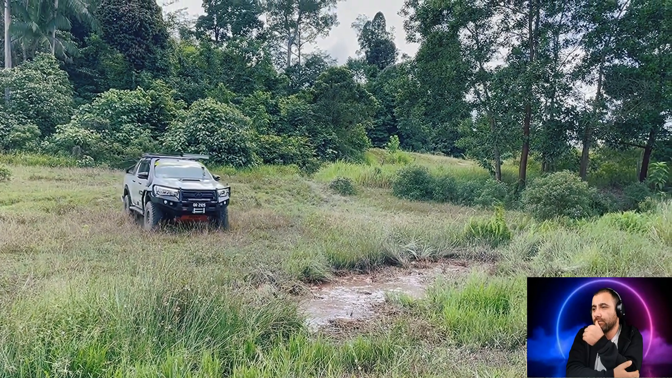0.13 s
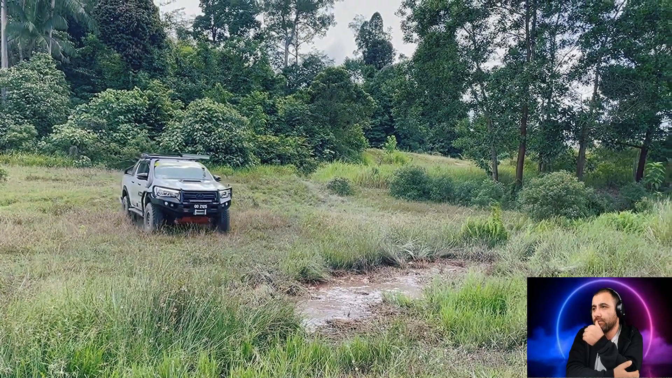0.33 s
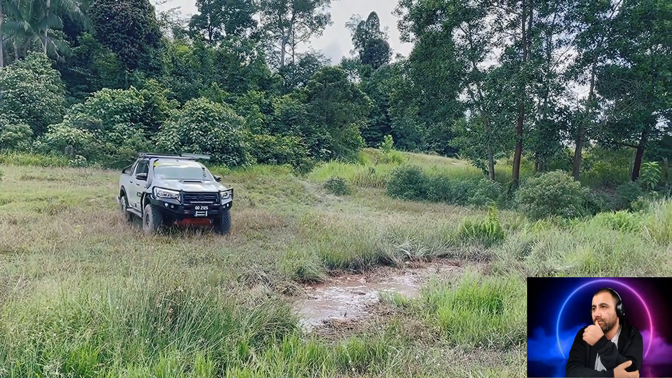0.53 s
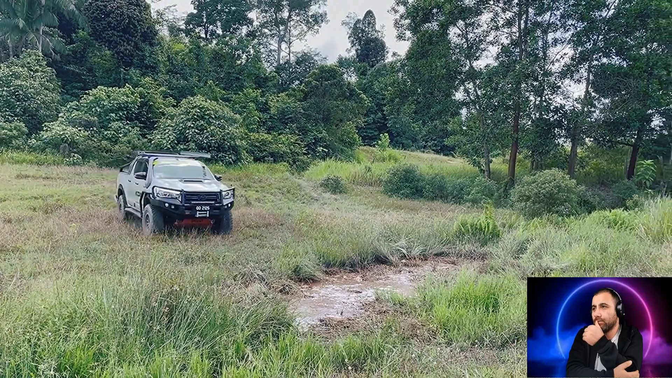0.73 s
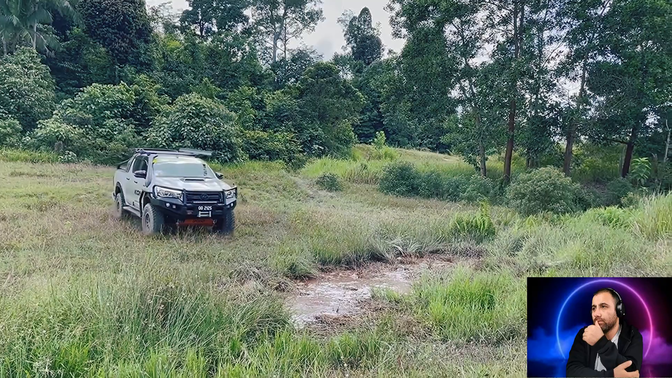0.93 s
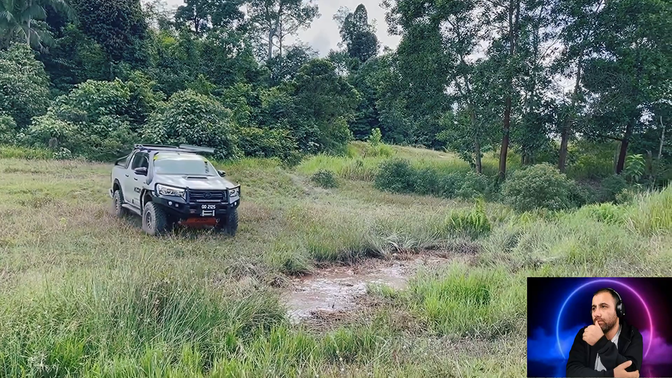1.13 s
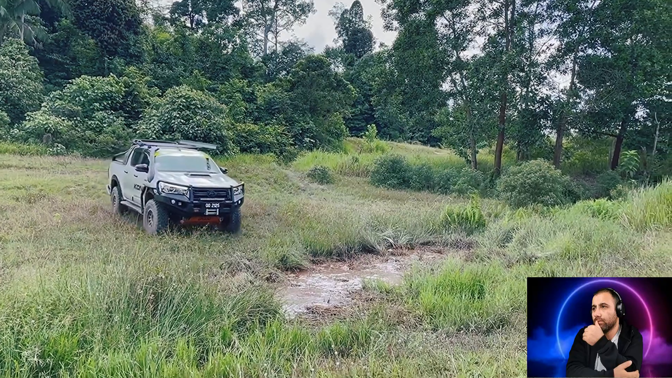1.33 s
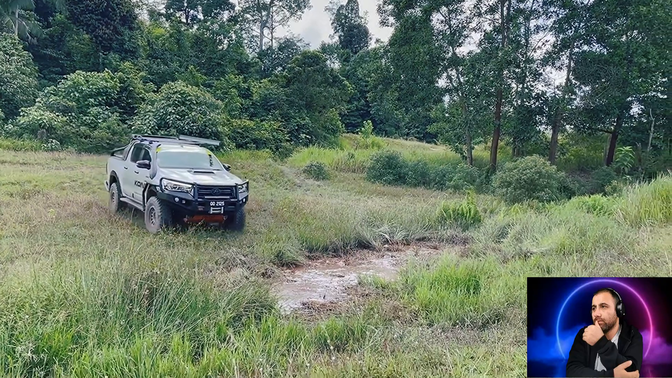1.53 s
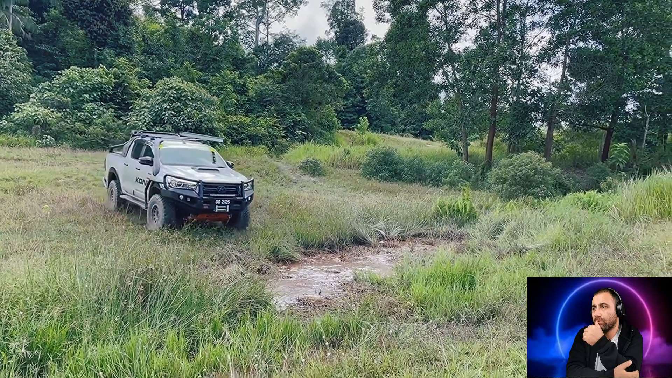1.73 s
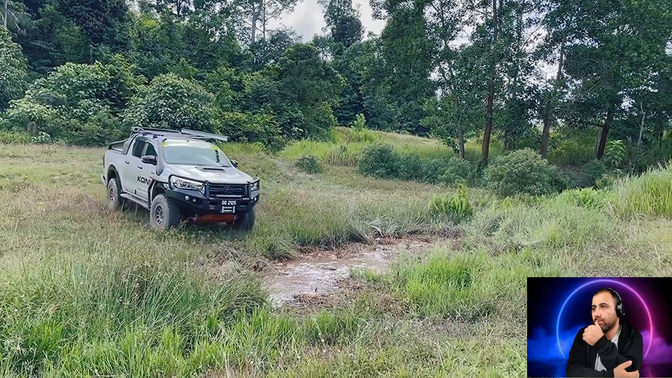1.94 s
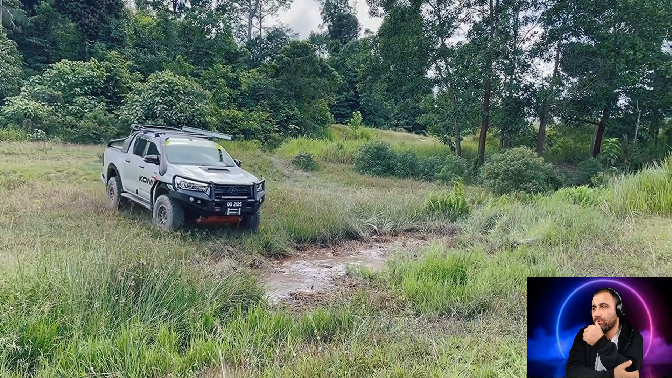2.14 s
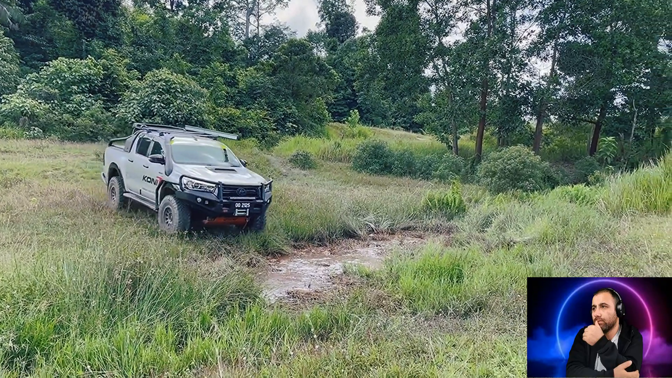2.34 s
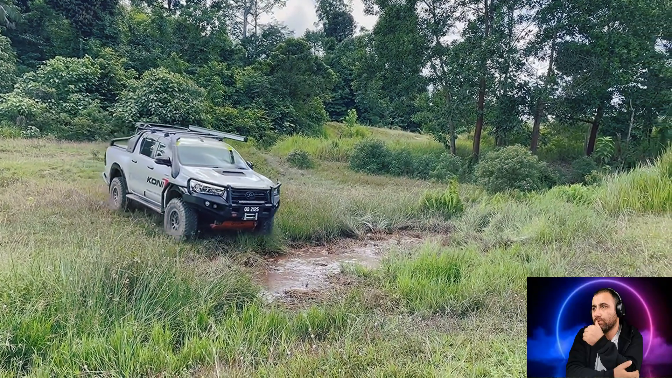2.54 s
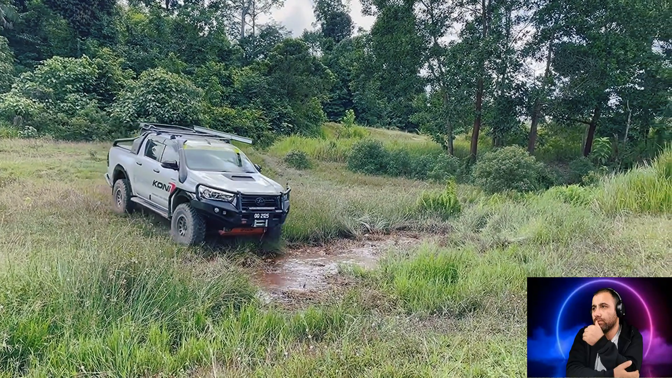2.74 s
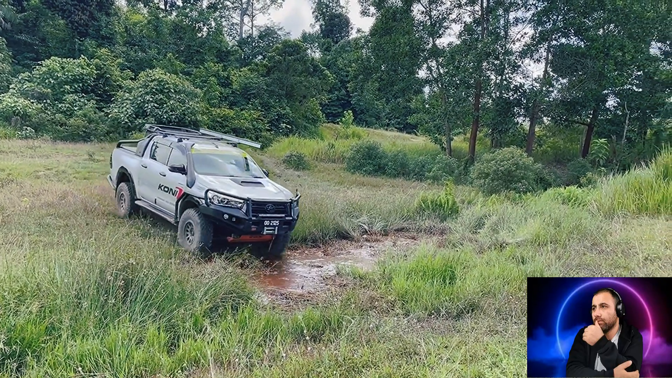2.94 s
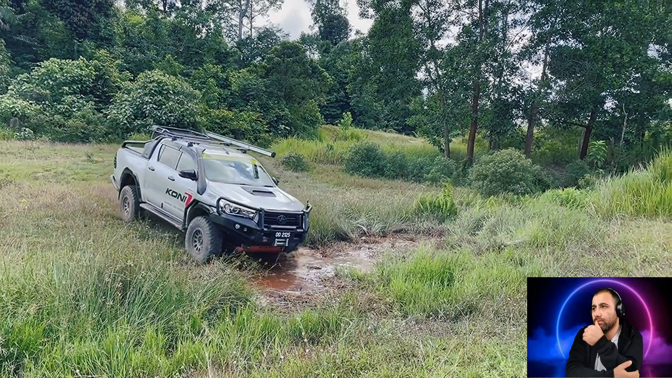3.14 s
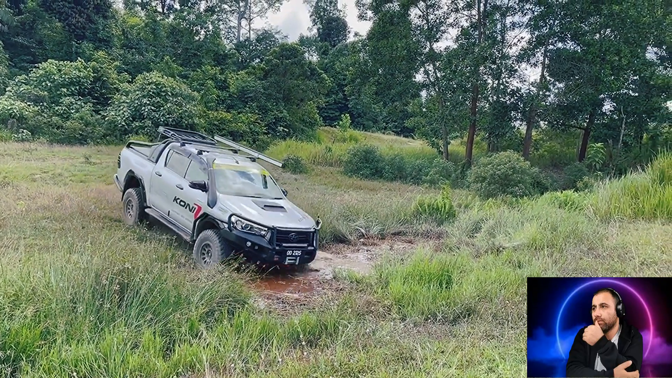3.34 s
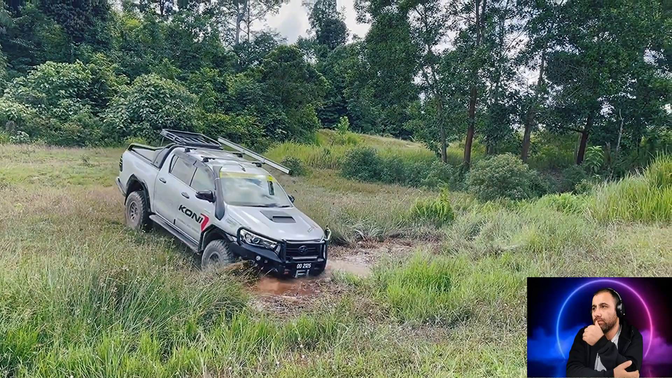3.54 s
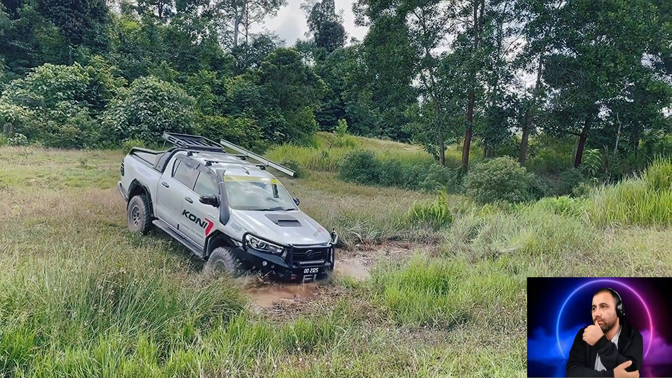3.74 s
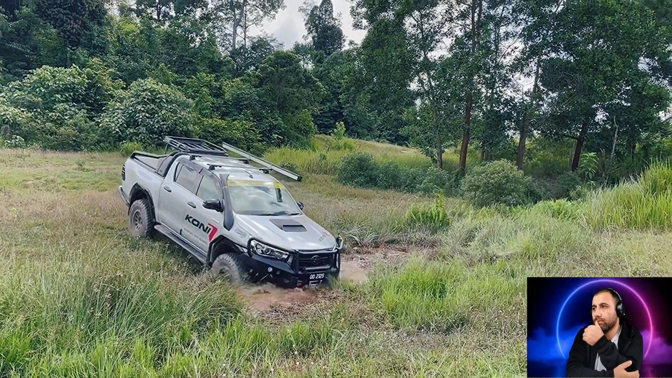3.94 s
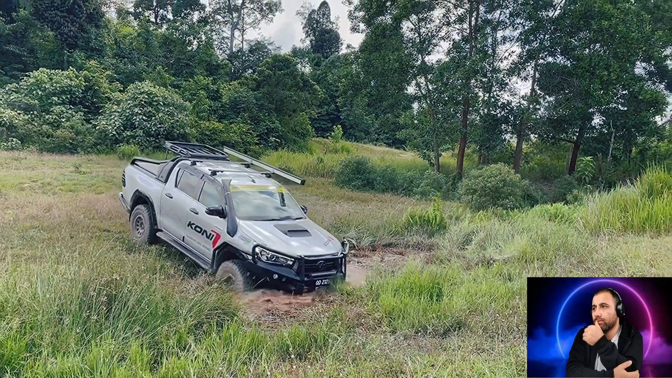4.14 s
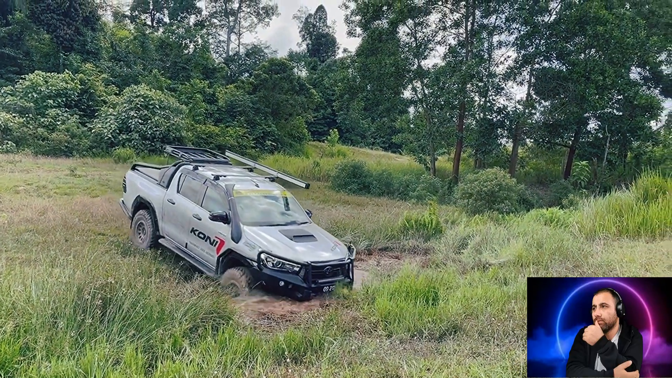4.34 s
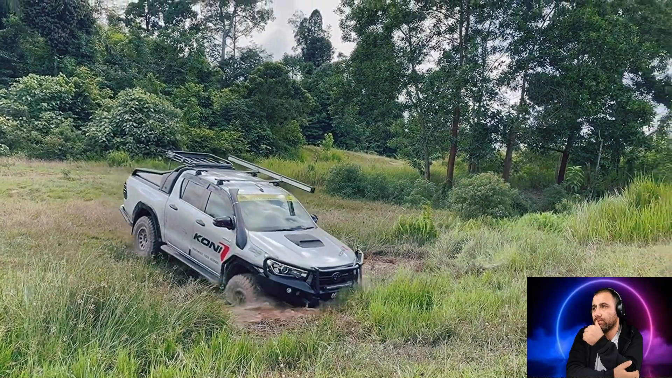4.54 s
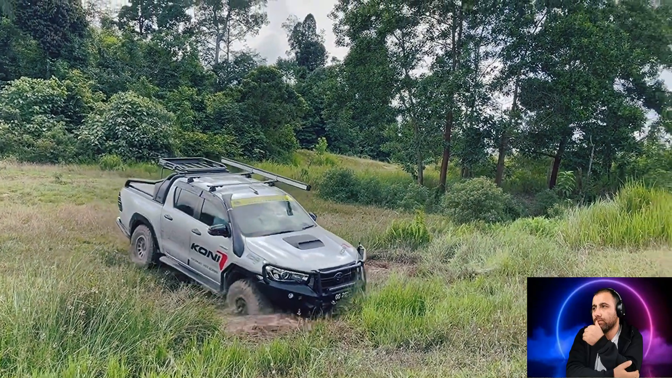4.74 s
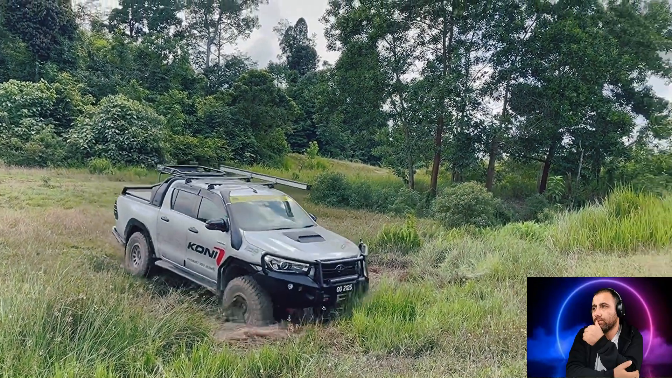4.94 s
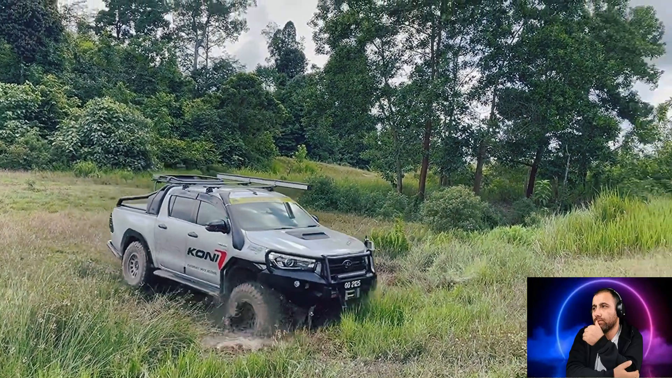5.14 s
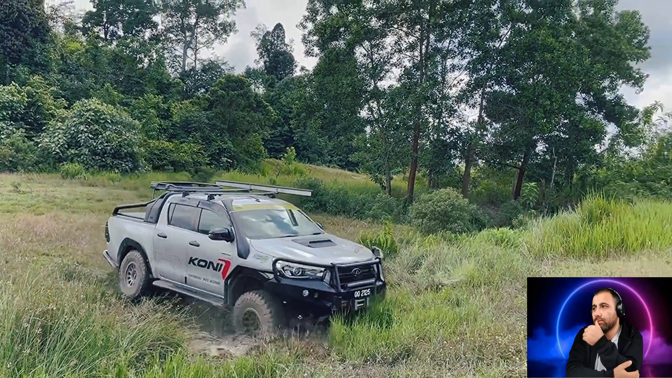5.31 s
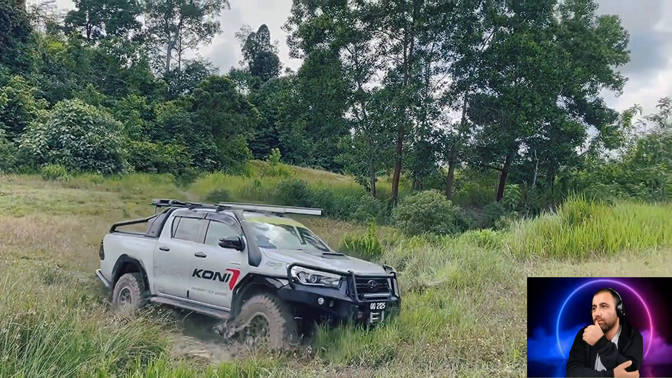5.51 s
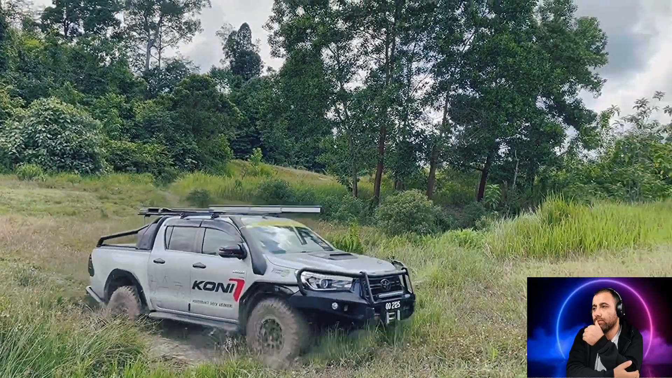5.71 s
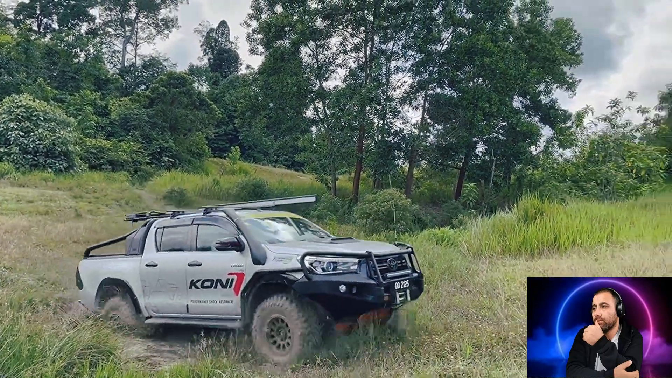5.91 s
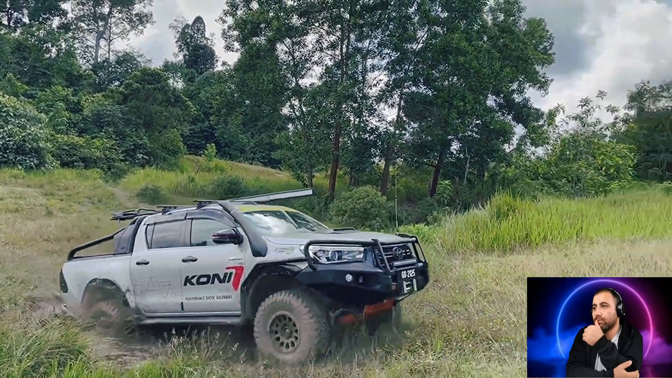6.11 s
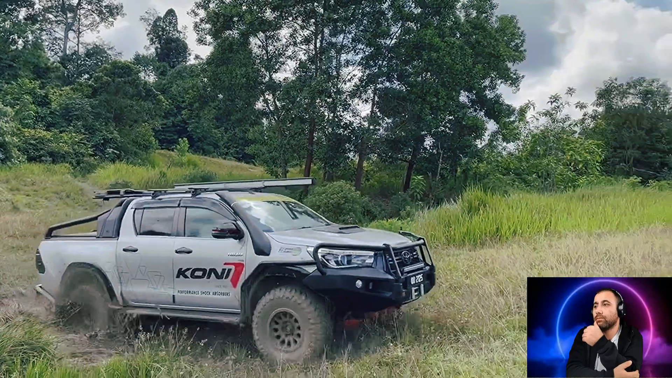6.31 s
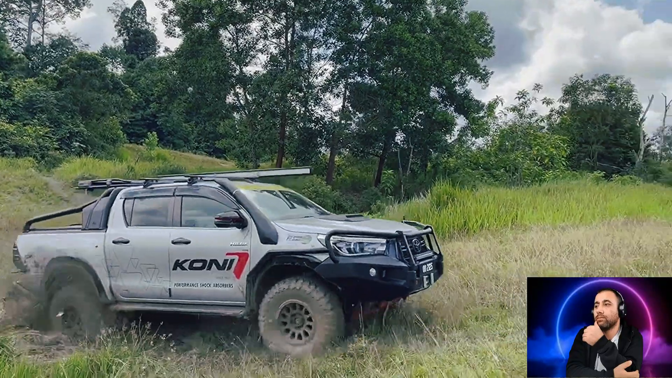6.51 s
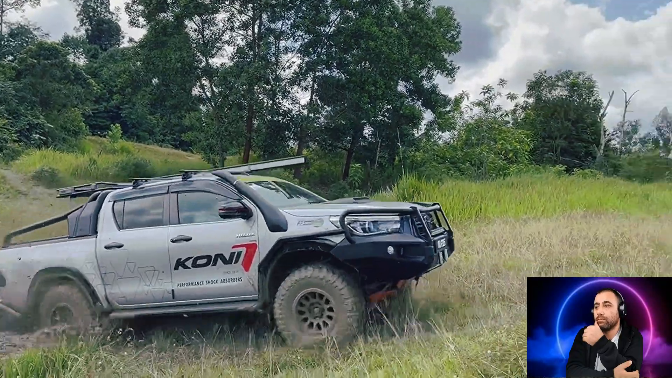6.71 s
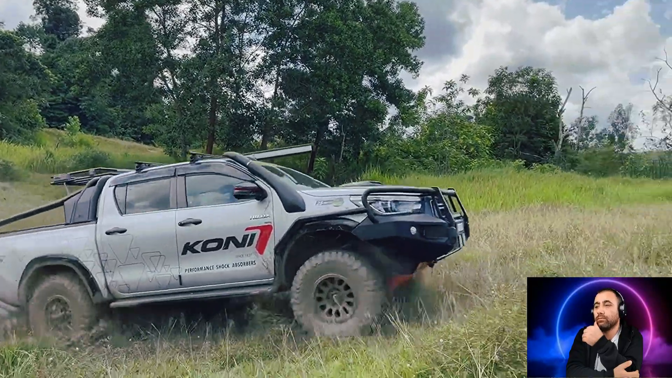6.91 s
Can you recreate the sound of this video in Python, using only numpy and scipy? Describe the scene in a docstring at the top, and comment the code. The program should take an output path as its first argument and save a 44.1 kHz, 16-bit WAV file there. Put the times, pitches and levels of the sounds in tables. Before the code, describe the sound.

A diesel pickup blips and idles in, splashes into a muddy hole, then revs hard and climbs out close by, flinging mud.

```python
"""In a mud hole with leaves all round: a four-cylinder diesel pickup blips, idles in, splashes, then revs hard
and climbs out close by. Exhaust tones follow shaft orders, each firing excites block resonances and noise bursts.
Tyres brush grass, slap and shove water, then fling mud: shaped noise, plus short rising sines for bubbles.
Low hums, gliding drones, body thumps and a faint hiss in the grass complete it; the truck sits a little left."""
import sys
import numpy as np
from scipy import signal
from scipy.fft import rfft, irfft, next_fast_len
from scipy.io import wavfile
from scipy.ndimage import uniform_filter1d, map_coordinates

SR = 44100
rng = np.random.default_rng(int(sys.argv[2]) if len(sys.argv) > 2 else 0)


def invert_db(x):
    """Field ratio 10**(x/20) for x, a level in decibels (scalar or array-like)."""
    u = np.asarray(x, float) / 20
    return 10 ** u


def materialize(psi):
    """Save the field psi as 16-bit PCM at rate SR to the path in sys.argv[1].

    A 1-D psi becomes a single channel; in a 2-D psi each row is a channel.
    """
    bounded = np.clip(np.atleast_2d(psi).T, -1, 1)
    quanta = np.round(bounded * 32767).astype(np.int16)
    wavfile.write(sys.argv[1], SR, quanta)


N = 307022
TIME_S = np.arange(N) / SR


def unit(x):
    """Scaled to rms 1."""
    return x / np.sqrt(np.mean(x ** 2) + 1e-20)


def along(points, hz):
    """Interpolates (Hz, value) points on a log frequency axis."""
    f, v = np.transpose(points)
    return np.interp(np.log(hz + 1), np.log(f + 1), v)


def curves(rows):
    """One value per sample for each column after the time."""
    s, *cols = np.transpose(rows)
    return [np.interp(TIME_S, s, c) for c in cols]


def bumps(rows):
    """Sum of Gaussian level changes in dB; length is the half-width at 1/e."""
    return sum(db * np.exp(-((TIME_S - s) / length) ** 2) for s, db, length in rows)


def wobble(rate):
    """A smooth random curve, rate knots a second."""
    coarse = np.arange(0, N + 16, 16)
    knots = rng.standard_normal(int(N * rate / SR) + 4)
    return np.interp(np.arange(N), coarse, map_coordinates(knots, [coarse * rate / SR]))


def filtered(x, response):
    """x times a response of frequency."""
    m = next_fast_len(N + 8192)
    return irfft(rfft(x, m) * response(np.fft.rfftfreq(m, 1 / SR)), m)[..., :N]


def coloured(x, spectrum):
    """x through a spectrum, at rms 1."""
    return unit(filtered(x, lambda hz: invert_db(along(spectrum, hz))))


def grainy(spiky_db):
    """White noise whose grains differ in size."""
    return rng.standard_normal(N) * invert_db(spiky_db * wobble(600))


def tone(turns, waver_db, drift):
    """A sine that keeps dipping in level and wavers in phase; rms 1 between the dips."""
    phase = 2 * np.pi * turns + drift * wobble(14)
    return np.sqrt(2) * invert_db(-waver_db * np.abs(wobble(12))) * np.sin(phase)


def patchy(x, patchy_db):
    """Random patches of more and less level, some 400 Hz by 50 ms."""
    z = signal.stft(x, nperseg=512)[2]
    field = uniform_filter1d(rng.standard_normal(z.shape), size=5, axis=0)
    field = uniform_filter1d(field, size=9, axis=1)
    return signal.istft(z * invert_db(patchy_db * unit(field)), nperseg=512)[1][:N]


def scattered(x):
    """Grass and trees turn the phase of every frequency, and keep changing it."""
    z = signal.stft(x, nperseg=512)[2]
    a, b = uniform_filter1d(rng.standard_normal((2, *z.shape)), size=12, axis=2)
    return signal.istft(z * np.exp(1j * np.arctan2(a, b)), nperseg=512)[1][:N]


def drive():
    """Shaft speed in Hz, and each layer's level in dB from load, revs and nearness."""
    # Engine speed. Each row: time in seconds, shaft speed in Hz.
    shaft_rows = [(0, 14), (.23, 18), (.4, 21), (.7, 24.4), (1, 22), (1.3, 19), (1.47, 13), (1.7, 12.87),
                  (2.6, 12.87), (3, 12.4), (3.75, 12.8), (4, 12.3), (4.18, 11.2), (4.35, 12.7), (4.5, 13.9),
                  (4.6, 15.8), (4.8, 19.8), (4.93, 21.2), (5.1, 23.8), (5.22, 27.9), (5.39, 31.4),
                  (5.62, 34.8), (5.98, 33), (6.12, 31.5), (6.34, 28.5), (6.72, 28.5), (6.96, 24.2)]
    # The driver's foot. Each row: time in seconds, load in dB over idle.
    load_rows = [(0, 2), (.23, 6.5), (.62, 16), (1, 14.5), (1.3, 10), (1.62, 1), (2.4, -2), (3.06, -0.5),
                 (3.75, 1.5), (4.15, 10), (4.65, 13.5), (4.9, 15.5), (5.18, 16.5), (5.36, 15.5),
                 (5.54, 17.5), (5.67, 17.5), (6.02, 16.5), (6.36, 16), (6.74, 16.5), (6.96, 22.5)]
    # The truck comes closer. Each row: time in seconds, distance in m.
    path_rows = [(0, 30.3), (3, 12.8), (4, 9.25), (4.9, 7.86), (5.62, 5.9), (6.96, 5.84)]
    # How layers follow the drive. Each entry: base level in dB, dB per dB of load,
    # dB when the revs term is one, dB per dB of nearness.
    follows = {"roar": (-51.5, 0.9713, -1.5, 1.0181), "thrum": (-57, 0.3212, 15.5, 0.7468),
               "clatter": (-65, 0.4543, 6, 1.8673), "knock": (-50, -1.5, -11, -1.04),
               "ring": (-48, -0.14, -21.5, -1.12), "rattle": (-62.5, 0.84, 9, -1.5),
               "eighth": (-55, 1.0, 4, 0.2558), "fourth": (-48.5, 0.3269, -5, 0.44),
               "sixth": (-47, -1.18, 18, 0.73), "spray": (-64, 0.3291, 11.5, 1.5)}
    revs_zero_hz, revs_scale_hz = 14.1, 11.45  # shaft speed where the revs term is zero; its tanh scale
    (shaft_hz,), (load_db,), (distance_m,) = curves(shaft_rows), curves(load_rows), curves(path_rows)
    near_db = 20 * np.log10(path_rows[0][1] / distance_m)
    revs = np.tanh((shaft_hz - revs_zero_hz) / revs_scale_hz)
    level_db = {name: base + a * load_db + b * revs + c * near_db for name, (base, a, b, c) in follows.items()}
    return shaft_hz, level_db


def exhaust_orders(turns, level_db):
    """Exhaust boom: wavering sines at multiples of shaft speed."""
    # Orders beside the fourth. Each row: multiple of shaft speed, level in dB re fourth.
    order_rows = [(3, -29), (5, -18), (7, -11), (9, -13.5), (10, -14.5), (12, -16)]
    # The boom surges and sags as wheels grip and slip. Each row: middle in seconds, change in dB,
    # half-width in seconds.
    surge_rows = [(4.303, 6, 0.28), (5.404, 2, .05), (5.612, -3, 0.08), (5.954, 5, 0.045),
                  (6.135, -5, 0.02), (6.333, -10, 0.025), (6.404, 3.5, 0.028), (6.76, 2, 0.036),
                  (6.917, -12, 0.07)]
    # The twelfth order sings as the engine strains up from lugging. Each row: time in seconds, level in dB.
    strain_rows = [(4.05, -60), (4.2, -33), (4.3, -30), (4.5, -28), (4.57, -32), (4.75, -33), (5.1, -30),
                   (5.25, -50), (5.4, -80)]
    # the tailpipe swings out from behind the body and frees the boom
    tailpipe_s, tailpipe_turn_s, tailpipe_db = 4.93, 0.15, 22
    fourth_db = level_db["fourth"] + tailpipe_db / (1 + np.exp((tailpipe_s - TIME_S) / tailpipe_turn_s))
    fourth_db += bumps(surge_rows)
    orders = tone(4 * turns, waver_db=1.8, drift=.14)
    orders += sum(invert_db(db) * tone(k * turns, waver_db=6, drift=.8) for k, db in order_rows)
    sixth = invert_db(level_db["sixth"]) * tone(6 * turns, waver_db=3, drift=.3)
    eighth = invert_db(level_db["eighth"]) * tone(8 * turns, waver_db=2.5, drift=.25)
    twelfth = invert_db(curves(strain_rows)[0]) * tone(12 * turns, waver_db=2, drift=.2)
    return invert_db(fourth_db) * orders + sixth + eighth + twelfth


def block_knock(turns, shaft_hz, since_s, strength, level_db):
    """Noisy blows and one soft push per firing ring the resonances of the block."""
    # Block resonances. Each row: centre in Hz, width in Hz, relative level in dB.
    mode_rows = [(275, 30, 1), (560, 36, 9.5), (710, 60, 0), (1265, 100, -3.5), (1800, 160, -18),
                 (2280, 130, -18), (2750, 450, -16)]
    # The low ring carries best with the bonnet towards the microphone. Each row: time in seconds, gain in dB.
    facing_rows = [(0, -19), (.9, -3), (1.3, 3.5), (2.2, 2), (2.9, -4), (3.3, -14), (6.96, -8)]
    valves_share = .3  # a weaker knock halfway between firings
    push_s, soft_hz = .0055, 900  # blows ring mainly the modes above soft_hz
    ring_late = .6  # the soft push comes this share of a firing interval late
    bay_hz, bay_width_hz = 580, 130  # it swells through the engine bay's air
    loaded_rise = 1.11  # under load the ring sounds higher by this factor

    def block(f):
        modes = enumerate(mode_rows)
        return sum((-1) ** k * invert_db(db) * 1j * f * w / (c * c - f * f + 1j * f * w) for k, (c, w, db) in modes)

    def push(s):
        return np.maximum(s, 0) / push_s * np.exp(1 - np.abs(s) / push_s)

    def sharp(f):
        return block(f) * (1 - .75 / (1 + (f / soft_hz) ** 6))

    def through_bay(f):
        return block(f) * 1j * f / (bay_hz ** 2 - f * f + 1j * f * bay_width_hz)

    envelope = .16 + push(since_s) + valves_share * push(since_s - .25 / shaft_hz)
    blows = strength * envelope * rng.standard_normal(N)
    knock = invert_db(level_db["knock"]) * unit(filtered(blows, sharp))
    pushes = np.diff(np.floor(2 * turns - ring_late + .035 * wobble(26)), prepend=0) > 0
    ring_db = level_db["ring"] + curves(facing_rows)[0] + 2.4 * wobble(20)
    ring = invert_db(ring_db) * unit(filtered(1.0 * pushes, through_bay))
    rattle = invert_db(level_db["rattle"]) * unit(filtered(blows, lambda f: block(f / loaded_rise)))
    return knock + ring + rattle


def firing_noise(since_s, strength, level_db):
    """Roar, thrum and clatter: each firing shakes out a decaying burst of coloured noise."""
    # Spectra of roar, thrum and clatter. Each row: frequency in Hz, relative density in dB per Hz.
    pipe_spectrum = [(18, -49), (30, -32), (41, -39), (54, -4), (70, -7), (91, -3), (110, -2.5), (161, 0),
                     (263, -5.5), (331, -13.5), (480, -17.5), (620, -69), (1060, -120)]
    thrum_spectrum = [(210, -5), (350, -5.5), (434, -7.5), (554, 4), (718, 1), (810, 1.5), (1100, -18),
                      (1430, -74), (2420, -120)]
    knock_spectrum = [(530, -9.5), (900, 3.5), (1360, 1.5), (1620, -1.5), (1840, -2), (2050, -9),
                      (2290, -8.5), (2570, -13.5), (3390, -14.5), (3880, -22), (4500, -17.5), (5850, -21),
                      (9900, -120)]

    def bursts(steady, t60_s):
        """Each burst dies in a fixed time, so fast firings smear together."""
        gate = steady + strength * invert_db(-60 * since_s / t60_s)
        return gate / np.sqrt(uniform_filter1d(gate ** 2, SR // 8)) * rng.standard_normal(N)

    roar_db = level_db["roar"] + 0.71 * wobble(26.0)
    roar = invert_db(roar_db) * coloured(bursts(steady=1.0, t60_s=0.091), pipe_spectrum)
    thrum_db = level_db["thrum"] + 0.11 * wobble(21)
    thrum = invert_db(thrum_db) * coloured(bursts(steady=0.84, t60_s=0.78), thrum_spectrum)
    clatter_db = level_db["clatter"] + 0.083 * wobble(3.5)
    clatter = invert_db(clatter_db) * coloured(bursts(steady=.9, t60_s=.05), knock_spectrum)
    return roar + patchy(thrum + clatter, patchy_db=1.0)


def engine():
    """Shaft rotation times the firings that drive exhaust, block and noise."""
    firing_at_s = 1.887  # moment of one firing; the others follow from the shaft
    shaft_hz, level_db = drive()
    turns = np.cumsum(shaft_hz) / SR
    turns += -turns[round(firing_at_s * SR)] % 1
    firing = np.floor(2 * turns).astype(int)  # two firings a turn
    since_s = (2 * turns - firing) / (2 * shaft_hz)
    strength = invert_db(.8 * rng.standard_normal(firing.max() + 1))[firing]
    tones = exhaust_orders(turns, level_db)
    knock = block_knock(turns, shaft_hz, since_s, strength, level_db)
    return tones + knock + firing_noise(since_s, strength, level_db)


def hums():
    """Two low unsteady tones under the idle that sink away once the engine pulls."""
    # Each row: frequency in Hz and level in dB, both before the fade.
    hum_rows = [(70.6, -39), (116, -43.5)]
    fade_s, fade_db_per_s = 4.2, 38
    late_s = np.maximum(TIME_S - fade_s, 0)
    warped_s = TIME_S - 0.031 * late_s ** 2  # pitch falls by 6.2 % of its start value per second
    return sum(invert_db(db - fade_db_per_s * late_s) * tone(hz * warped_s, waver_db=4, drift=.6) for hz, db in hum_rows)


def drones():
    """Unsteady tones that swell and glide under power."""
    # Each row: middle in seconds, length in seconds, middle pitch in Hz, glide in Hz per second, level in dB.
    drone_rows = [(.5, 0.28, 176, 85, -39), (.75, 0.55, 144.6, 20, -38.5), (.9, 0.95, 112.8, 5.5, -40.5),
                  (6.298, 0.57, 263.3, -27.5, -29.5), (6.901, 0.17, 255, -43, -33)]
    total = np.zeros(N)
    for middle_s, length_s, hz, glide, db in drone_rows:
        u = TIME_S - middle_s
        swell = np.exp(-(2 * u / length_s) ** 4)
        total += invert_db(db) * swell * tone((hz + glide * u / 2) * u, waver_db=3, drift=1.0)
    return total


def leaf_hiss():
    """Two independent coloured noises and their shared, slowly wavering level in dB."""
    # Each row: frequency in Hz, relative density in dB per Hz.
    leaf_spectrum = [(18, -37), (30, -2), (80, -2), (150, 2), (330, -18), (560, -5.5), (900, -23),
                     (2000, -35.5), (3500, -38), (5200, -31), (6200, -34), (7050, -22.5), (8500, -30.5),
                     (10500, -38.5), (12800, -32.5), (14600, -35), (15400, -34)]
    middle, around = (coloured(rng.standard_normal(N), leaf_spectrum) for _ in "ab")
    return middle, around, -48 + 1.1 * wobble(1.96)


def insect_hiss():
    """A thin band of noise in the grass swells once, perhaps insects."""
    # Each row: frequency in Hz, relative density in dB per Hz.
    insect_spectrum = [(4300, -60), (4900, -2), (5200, 0), (5600, -6), (6200, -60)]
    middle_s, half_width_s, db = 1.03, 0.36, -64
    swell = np.exp(-((TIME_S - middle_s) / half_width_s) ** 2)
    return invert_db(db + 1.5 * wobble(19.4)) * swell * coloured(rng.standard_normal(N), insect_spectrum)


def bubbles(from_s, to_s):
    """Short decaying sines; a bubble's pitch rises as it nears the surface."""
    start, pitch, size = rng.random((2400, 3)).T
    life_s = np.arange(SR // 60) / SR
    start_hz = (800 * 8 ** pitch)[:, None]
    cycles = start_hz * life_s * (1 + 8 * life_s)
    blips = invert_db(14 * size)[:, None] * np.sin(2 * np.pi * cycles) * cycles * np.exp(-cycles / 3.2)
    first = (SR * (from_s + start * (to_s - from_s))).astype(int)
    at = first[:, None] + np.arange(len(life_s))
    total = np.bincount(at.ravel(), blips.ravel(), N)
    inside = (TIME_S > from_s) & (TIME_S < to_s)
    return total / total[inside].std()


def tyres():
    """Grass, then mud spray as clumpy hiss; splashes shove bubbling water, hold and drain; treads slap it."""
    # Wheels shove into the water. Each row: start in seconds, water level in dB, spray level in dB,
    # hold in seconds, t60 in seconds.
    splash_rows = [(3.02, -38, -41.5, 0.065, 0.3), (3.128, -47.5, -60, 0.044, 0.74),
                   (3.234, -40, -35.5, 0.018, 0.15), (3.26, -44.5, -42, 0.15, .9),
                   (3.4, -42.5, -39.5, 0.043, 0.74), (3.452, -45, -36, 0.093, 1.86),
                   (3.771, -43.5, -36, 0.019, 0.53), (3.856, -50.5, -69, 0.69, 6.8)]
    # The tread slaps the water flat. Each row: start in seconds, level in dB.
    slap_rows = [(3.0215, -33), (3.041, -35), (3.073, -34), (3.085, -37), (3.165, -41), (3.249, -30),
                 (3.36, -39), (3.419, -35), (3.477, -35)]
    # Spinning wheels fling heaps of mud. Each row: middle in seconds, dB over the steady spray,
    # half-width in seconds.
    fling_rows = [(5.195, 2.5, 0.16), (5.603, 2.5, 0.19), (6.042, 3.5, 0.081), (6.545, 3.5, 0.29)]
    # Spectra of spray and of water. Each row: frequency in Hz, relative density in dB per Hz.
    spray_spectrum = [(1760, 5.5), (3000, -2), (4730, -7.5), (5630, -9.5), (6540, -8), (7590, -14),
                      (7980, -9), (8390, -7), (9920, -10), (11400, -6), (13300, -8)]
    water_spectrum = [(290, -53), (500, -25), (605, 2), (900, 0), (1430, 6), (1590, 3), (1900, 4.5),
                      (2500, -6), (3560, 1), (5200, -8.5), (7640, -18), (8290, -9.5), (13000, -19)]
    water_rise_s, spray_rise_s, slap_rise_s = .006, .02, .0007
    slap_hold_s, slap_t60_s = 0.00078, 0.05
    wade_from_s, wade_to_s = 3.0, 4.4
    grass_db, grass_share = -56.5, 0.51  # before the water: grass, which follows the drive less

    def shove(s, db, rise_s, hold_s, t60_s):
        drain_db = -60 * np.maximum(TIME_S - s - hold_s, 0) / t60_s
        return invert_db(db + drain_db) * (1 - np.exp(-np.maximum(TIME_S - s, 0) / rise_s))

    slap_gate = sum(shove(s, db, slap_rise_s, slap_hold_s, slap_t60_s) for s, db in slap_rows)
    slaps = slap_gate * coloured(rng.standard_normal(N), water_spectrum)

    spin_db = drive()[1]["spray"]
    brushed_db = grass_db + grass_share * (spin_db - grass_db)
    rolling_db = np.where(TIME_S < wade_from_s, brushed_db, spin_db) + bumps(fling_rows)
    thrown_power = sum(shove(s, db, spray_rise_s, hold, t60) ** 2 for s, _, db, hold, t60 in splash_rows)
    spray_gate = np.sqrt(invert_db(2 * rolling_db) + thrown_power) * invert_db(0.79 * wobble(18))
    spray = spray_gate * coloured(grainy(spiky_db=0.8), spray_spectrum)

    wet = np.sqrt(sum(shove(s, db, water_rise_s, hold, t60) ** 2 for s, db, _, hold, t60 in splash_rows))
    slosh = .85 * grainy(spiky_db=2.5) + .45 * bubbles(wade_from_s, wade_to_s)
    water = wet * invert_db(.7 * wobble(40)) * coloured(slosh, water_spectrum)
    return slaps + patchy(spray + water, patchy_db=1.1)


def thumps():
    """The body drops on its springs, a lump of mud lands: a soft low ring for each."""
    # Each row: start in seconds, envelope peak in dB, frequency in Hz, rise to the peak in seconds.
    thump_rows = [(3.807, -26.5, 318, 0.0031), (3.8117, -25, 170, 0.0026), (5.66, -14.5, 61.3, 0.011),
                  (6.113, -9, 148, 0.0075), (6.215, -14.5, 252, 0.0059), (6.21, -15.5, 82.5, 0.032),
                  (6.859, -16, 99, 0.01)]
    total = np.zeros(N)
    for s, db, hz, rise_s in thump_rows:
        u = np.maximum(TIME_S - s, 0) / rise_s
        total += invert_db(db) * u * np.exp(1 - u) * np.sin(2 * np.pi * hz * (TIME_S - s))
    return total


def scene():
    """The truck in front, a little to the left; leaves all round."""
    # Narrow fixed dips in the spectrum. Each row: centre in Hz, half-width in Hz, share lost from 0 to 1.
    notch_rows = [(1620, 90, .7), (2070, 80, .7), (2560, 110, .75), (5750, 150, .45), (7620, 300, .95),
                  (10050, 250, .45)]
    # What the channels hear differently. Each row: frequency in Hz, side gain in dB.
    side_rows = [(30, -38), (60, -23), (92, -28), (140, -19.5), (210, -39), (330, -25), (500, -20.5),
                 (770, -13.5), (1170, -16), (1790, -7.5), (2740, -8.5), (4190, -4.5), (6410, -5),
                 (9810, -7.5), (15000, -8)]
    # How much louder the middle is on the left. Each row: frequency in Hz, left over right in dB.
    left_rows = [(25, 1.5), (100, 1), (250, 0), (600, 2.5), (1300, 2), (4400, 3.5), (8100, 0.5), (15000, 0)]
    top_hz = 13200  # nothing but the leaves and insects is kept above this
    lead_s, lead_fades_hz = 2.5e-5, 4000  # the left channel leads, except in the treble

    def notched(hz):
        dips = [1 - np.clip(lost, 0, 1) * np.exp(-((hz - c) / w) ** 2) for c, w, lost in notch_rows]
        return np.prod(dips, axis=0)

    def to_left(hz):
        delay_s = lead_s * np.exp(-(hz / lead_fades_hz) ** 2)
        lead = np.exp(1j * np.pi * hz * delay_s * np.array([[1], [-1]]))
        return lead * invert_db(along(left_rows, hz) * [[.5], [-.5]])

    truck = engine() + hums() + drones() + tyres() + thumps()
    truck = filtered(truck, lambda hz: hz < top_hz)
    leaves, around, leaves_db = leaf_hiss()
    mid = filtered(truck, notched) + invert_db(leaves_db) * leaves + insect_hiss()
    diffuse = invert_db(3.5) * scattered(truck) + invert_db(leaves_db + 8.0) * around
    side = filtered(diffuse, lambda hz: invert_db(along(side_rows, hz)))
    return filtered(mid, to_left) + [side, -side]


def top_cut(x):
    """Nothing passes above the cut-off."""
    return signal.sosfilt(signal.butter(12, 15630, fs=SR, output="sos"), x)


def record(dry):
    """The microphone drops deep bass."""
    low_cut_hz = 38
    mix = filtered(dry, lambda hz: hz ** 3 / np.sqrt(hz ** 6 + low_cut_hz ** 6))
    return top_cut(mix)


dry = scene()
out = record(dry)
materialize(out)
```